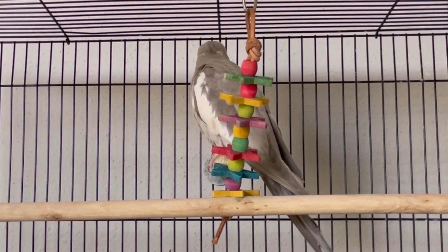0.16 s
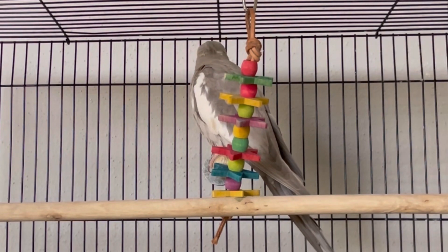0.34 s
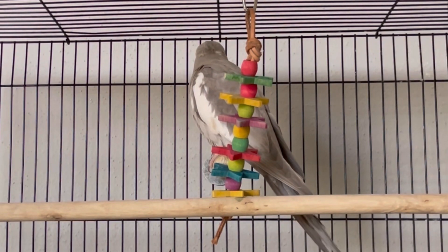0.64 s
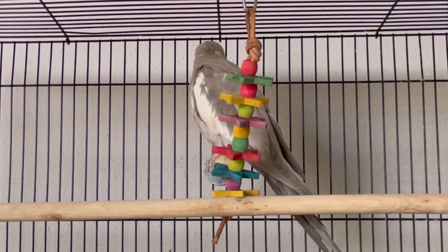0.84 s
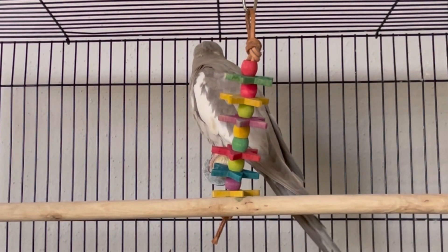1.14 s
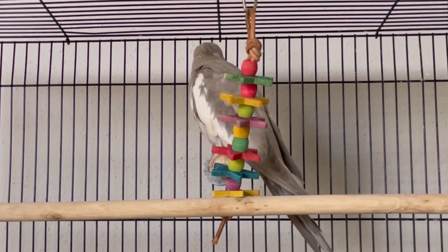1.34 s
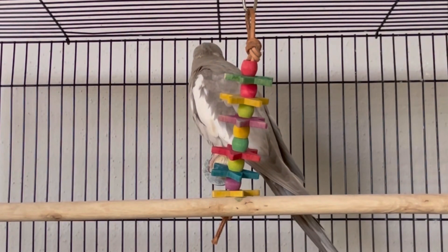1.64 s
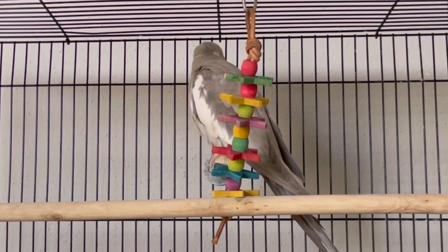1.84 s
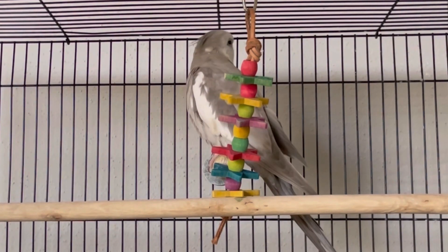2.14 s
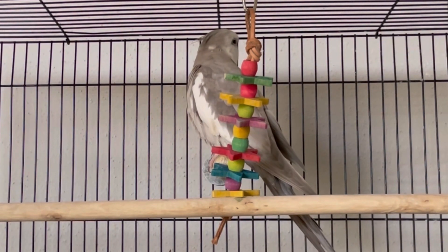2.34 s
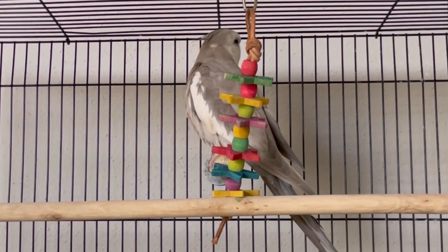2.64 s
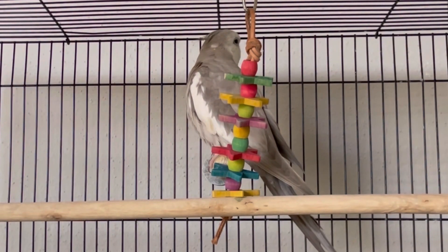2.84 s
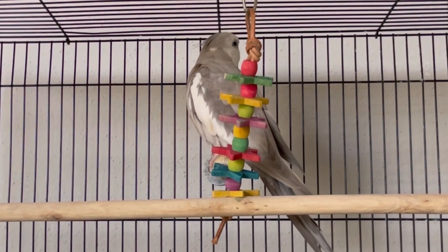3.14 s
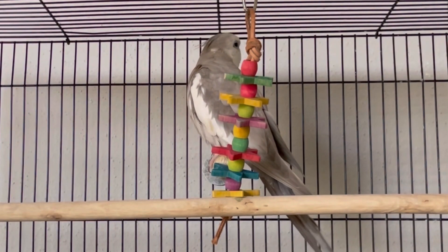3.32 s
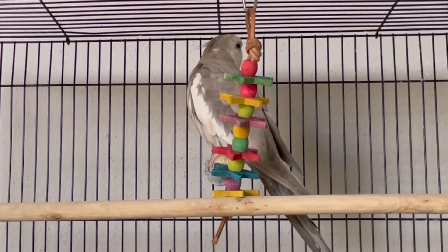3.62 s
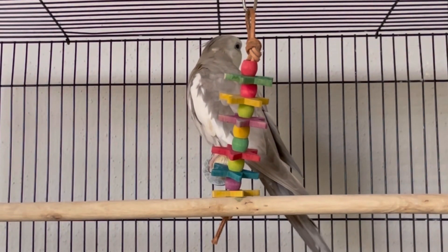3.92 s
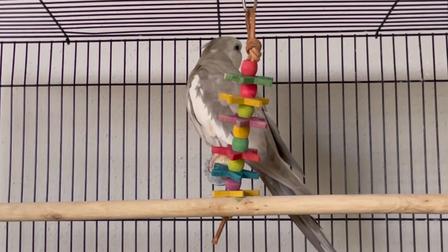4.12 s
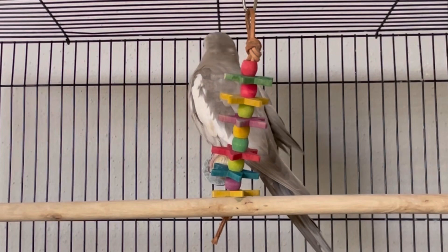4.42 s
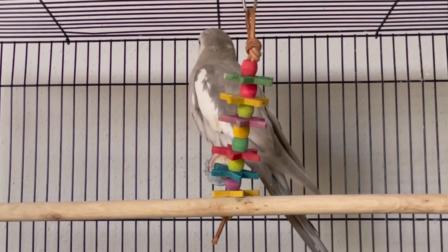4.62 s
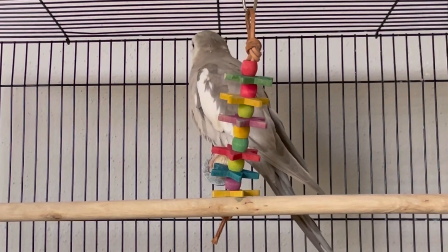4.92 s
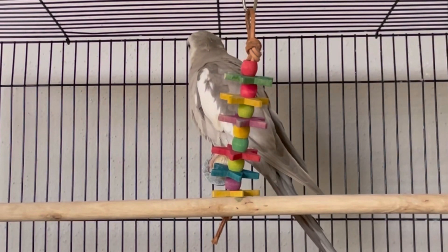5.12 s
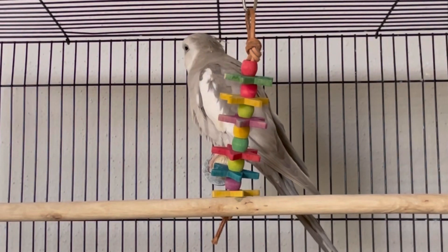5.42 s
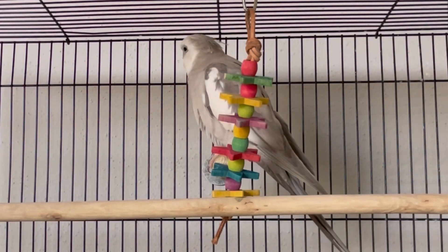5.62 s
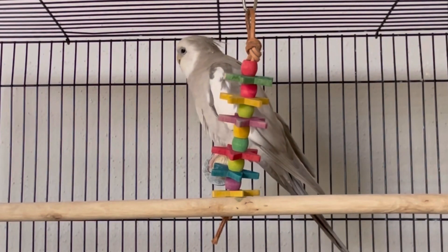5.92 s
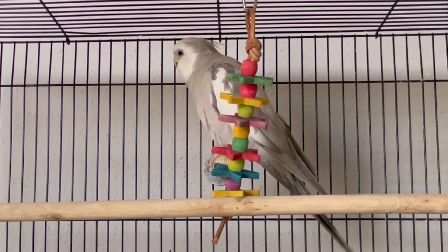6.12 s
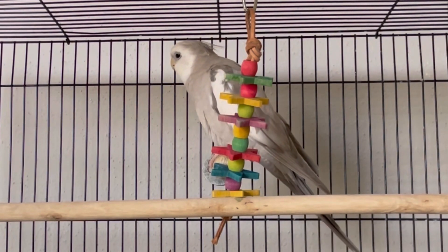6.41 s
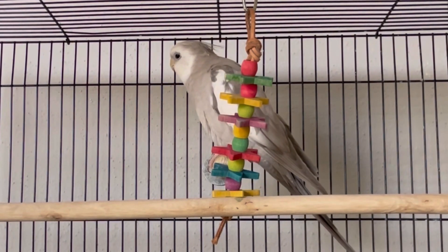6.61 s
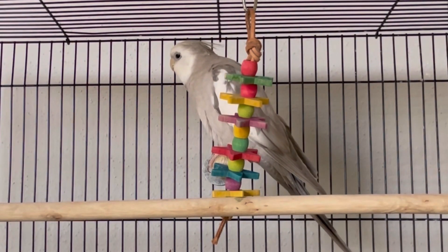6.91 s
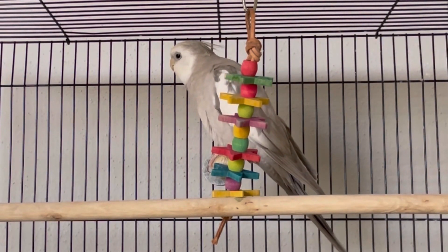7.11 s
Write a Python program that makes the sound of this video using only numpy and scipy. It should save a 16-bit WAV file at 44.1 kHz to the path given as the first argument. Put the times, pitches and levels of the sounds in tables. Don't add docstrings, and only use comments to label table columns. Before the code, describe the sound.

Three phrases from a caged cockatiel, separated by pauses. The first has bright falling and rising whistles with low fluttering notes; the second goes from soft peeps to a strong upward swoop and sharp dive; the third is harsher, with honks, croaky yelps and a later buzz. Near stereo pickup, lively reverberant walls, a slight metallic ring of bars, and quiet house rumble underneath.

```python
import sys
import numpy as np
from scipy import signal
from scipy.fft import rfft, irfft, next_fast_len
from scipy.io import wavfile
from scipy.ndimage import map_coordinates

SR = 44100
rng = np.random.default_rng(int(sys.argv[2]) if len(sys.argv) > 2 else 0)


def wrap_up_sound(samples):
    columns = np.atleast_2d(samples).T
    tamed = np.clip(columns, -1, 1)
    steps = np.round(tamed * 32767).astype(np.int16)
    wavfile.write(sys.argv[1], SR, steps)


def amplitude_ratio(level_db):
    exponent = np.asarray(level_db, float) / 20
    return 10 ** exponent


N = 320166


def along(points, hz):
    f, v = np.transpose(points)
    return np.interp(np.log(hz + 1), np.log(f + 1), v)


def unit(x):
    return x / np.sqrt(np.mean(x ** 2) + 1e-20)


def wobble(rate_hz):
    knots = rng.standard_normal(N // 32)
    return map_coordinates(knots, [np.arange(N) * min(rate_hz, 1300) / SR])


def filtered(x, response):
    m = next_fast_len(N + 8192)
    return irfft(rfft(x, m) * response(np.fft.rfftfreq(m, 1 / SR)), m)[..., :N]


def voiced(curve, second_db, upper_db):
    s, hz, db = np.transpose(curve)
    lift_db = .4 * (db.max() - db)
    return np.transpose([s, hz, db, second_db + lift_db, upper_db + lift_db])


def shaped(notes, manner):
    hurry, arch, attack_s, release_s, onset_db, tilt_db, end_db, second_db, upper_db = manner
    u = np.linspace(0, 1, num=25)
    glide = np.expm1(hurry * u) / np.expm1(hurry)
    lines = []
    for start_s, length_s, first_hz, last_hz, db in notes:
        hz = (first_hz + (last_hz - first_hz) * glide) * (1 + arch * np.sin(np.pi * u))
        opened = min(attack_s / length_s, .7)
        closing = np.clip(1 - release_s / length_s, opened + .04, .98)
        level_db = db + np.interp(u, [0, opened, closing, 1], [onset_db, 0, tilt_db, end_db])
        curve = np.transpose([start_s + length_s * u, hz, level_db])
        lines.append(voiced(curve, second_db, upper_db))
    return lines


def sing(notes, flow, rough, jitter, slope_db, fourth_db, breath_db, half_db, frayed=1):
    out = np.zeros(N)
    bend, air, shake, drift, fray = flow
    for rows in notes:
        s, *cols = np.transpose(rows)
        at = np.arange(round(s[0] * SR), min(round(s[-1] * SR), N + 1) - 1)
        hz, db, second_db, upper_db = (np.interp(at / SR, s, c) for c in cols)
        phase = 2 * np.pi * np.cumsum(hz * (1 + bend[at] + jitter * drift[at])) / SR
        overtones = amplitude_ratio(second_db) * np.sin(2 * phase) + amplitude_ratio(upper_db) * np.sin(3 * phase)
        for k in range(4, 8):
            partial_db = upper_db + fourth_db + slope_db * (k - 4)
            overtones += amplitude_ratio(partial_db) * np.sin(k * phase) * (k * hz < 16000)
        tone = np.sin(phase) + overtones * (1 + .7 * frayed * fray[at])
        tone *= np.sqrt(2) * (1 + rough * shake[at])
        tone *= 1 + amplitude_ratio(half_db) * np.sin(phase / 2)
        rise = np.clip((at - at[0] + (at[0] == 0) * SR) / (.0025 * SR), 0, 1)
        fall = np.clip((at[-1] - at) / (.005 * SR), 0, 1)
        gate = np.sin(np.pi / 2 * rise * fall) ** 2
        out[at] += amplitude_ratio(db) * gate * (tone + amplitude_ratio(breath_db) * air[at])
    return out


# glide_hurry (>0 late, <0 early), arch_share (of pitch), attack_s,
# release_s, onset_db, tilt_db, end_db, second_db (partial 2), upper_db (partials 3 up)
FALL_MANNER = (2.8, .005, .026, .005, -11, -2, -4, -35, -40)
PLUNGE_MANNER = (.3, .003, .002, .007, -1.5, -4, -18, -23, -36)
RISE_MANNER = (-3.5, .003, .014, .006, -10, 1.5, -3, -34, -42)
# start_s, length_s, first_hz, last_hz, level_db
FALLS = [
    (.998, .037, 3137, 2480, -17),
    (1.357, .031, 2994, 2450, -14.5),
]
# start_s, length_s, first_hz, last_hz, level_db
PLUNGES = [
    (1.031, .011, 2500, 1900, -24),
    (1.384, .01, 2480, 1850, -20),
    (4.003, .014, 2650, 1720, -19),
]
# start_s, length_s, first_hz, last_hz, level_db
RISES = [
    (1.152, .076, 2340, 2570, -18),
    (3.337, .115, 2420, 2670, -17.5),
]
# time_s, pitch_hz, level_db
OPENING = [
    (0, 2595, -14.5),
    (.03, 2605, -13.5),
    (.047, 2600, -13.5),
    (.053, 2520, -18),
]
# time_s, pitch_hz, level_db
SWOOP = [
    (3.566, 1263, -33),
    (3.6, 1540, -27),
    (3.622, 1790, -33),
    (3.645, 2030, -33),
    (3.676, 2270, -19),
    (3.724, 2545, -13),
    (3.76, 2705, -19),
    (3.78, 2750, -27),
    (3.82, 2798, -30),
]
# time_s, pitch_hz, level_db
DIVE = [
    (3.91, 2838, -30),
    (3.948, 2920, -18.5),
    (3.98, 2945, -17),
    (3.992, 2900, -11.5),
    (4.002, 2737, -15),
    (4.007, 2600, -20),
]


def whistles(flow):
    notes = shaped(FALLS, FALL_MANNER) + shaped(PLUNGES, PLUNGE_MANNER) + shaped(RISES, RISE_MANNER)
    notes += [voiced(OPENING, -38, -38), voiced(SWOOP, -37, -42), voiced(DIVE, -41, -45)]
    return amplitude_ratio(-1) * sing(notes, flow, rough=.017, jitter=.003, slope_db=1.5, fourth_db=-4,
                          breath_db=-46, half_db=-58)


PEEP_MANNER = (-.3, .003, .011, .01, -6, -1.5, -3, -16, -44)
# start_s, length_s, first_hz, last_hz, level_db
PEEPS = [
    (2.688, .042, 1265, 1500, -38),
    (2.778, .036, 1270, 1320, -37),
    (7.22, .08, 1320, 1400, -44),
]
# time_s, pitch_hz, level_db
HELD = [
    (3.032, 1712, -36.5),
    (3.084, 1722, -28),
    (3.162, 1773, -37.5),
    (3.19, 1750, -29.5),
    (3.226, 1763, -39),
    (3.232, 1792, -35),
    (3.3, 1763, -36.5),
]


def soft_notes(flow):
    notes = shaped(PEEPS, PEEP_MANNER) + [voiced(np.add(HELD, [0, 0, .7]), -31, -37)]
    return amplitude_ratio(1) * sing(notes, flow, rough=.035, jitter=.007, slope_db=-4, fourth_db=-4,
                         breath_db=-44, half_db=-60, frayed=.4)


SAG_MANNER = (-3.6, .003, .018, .02, 7, 1.5, -1.5, -25, -35)
# start_s, length_s, first_hz, last_hz, level_db
SAGS = [
    (.05, .056, 2330, 1600, -30),
    (1.223, .069, 2350, 1670, -27),
]


def sags(flow):
    return sing(shaped(SAGS, SAG_MANNER), flow, rough=.25, jitter=.025, slope_db=-4, fourth_db=-4,
                breath_db=-32, half_db=-45)


MURMUR_MANNER = (.3, .003, .008, .02, -9, -3, -5, -11, -19)
# start_s, length_s, first_hz, last_hz, level_db
MURMURS = [
    (.496, .016, 1700, 1640, -35),
    (.615, .115, 1885, 1730, -33.5),
    (.835, .1, 1780, 1700, -33),
]


def murmurs(flow):
    return amplitude_ratio(2) * sing(shaped(MURMURS, MURMUR_MANNER), flow, rough=.3, jitter=.013, slope_db=-7,
                         fourth_db=-10, breath_db=-12, half_db=-15, frayed=.2)


# time_s, pitch_hz, level_db
BUZZ = [
    (6.83, 2400, -52),
    (6.846, 2200, -33),
    (6.872, 2259, -27),
    (6.93, 2250, -30),
    (6.996, 2204, -28),
    (7.06, 2160, -24),
    (7.093, 2260, -28),
]


def buzz(flow):
    line = voiced(BUZZ, -29, -41)
    one_side = sing([line], flow, rough=.12, jitter=.014, slope_db=5, fourth_db=-17,
                    breath_db=-25, half_db=-30)
    other_side = sing([line * [1, 1.35, 1, 1, 1]], flow, rough=.24, jitter=.027, slope_db=-10,
                      fourth_db=-16, breath_db=-25.5, half_db=-12)
    return amplitude_ratio(2) * one_side + amplitude_ratio(-17) * other_side


HONK_MANNER = (.3, .015, .011, .006, -8, 1.5, -8, 2, -14)
# start_s, length_s, first_hz, last_hz, level_db
HONKS = [
    (5.445, .033, 2040, 2100, -31),
    (5.71, .05, 2190, 2210, -26),
    (5.846, .08, 2220, 2290, -26.5),
]
# time_s, pitch_hz, level_db
STEP = [
    (5.126, 1870, -45),
    (5.14, 1920, -41),
    (5.205, 1960, -37),
]
# time_s, pitch_hz, level_db
STEPPED = [
    (5.2, 2020, -35),
    (5.212, 2190, -28),
    (5.228, 2250, -26.5),
    (5.254, 2220, -30),
]


def squawks(flow):
    notes = shaped(HONKS, HONK_MANNER) + [voiced(STEP, -2, 4), voiced(STEPPED, -2, -13)]
    return amplitude_ratio(-1) * sing(notes, flow, rough=.2, jitter=.014, slope_db=-5, fourth_db=-14,
                          breath_db=-23, half_db=-36, frayed=.3)


YELP_MANNER = (4, .06, .008, .008, -5, 3, -9, 4, -22)
# start_s, length_s, first_hz, last_hz, level_db
YELPS = [
    (6.013, .035, 2203, 1870, -25),
    (6.125, .044, 2211, 1950, -24),
    (6.247, .045, 2228, 1880, -24),
]


def yelps(flow):
    return amplitude_ratio(-1) * sing(shaped(YELPS, YELP_MANNER), flow, rough=.06, jitter=.005, slope_db=-5,
                          fourth_db=-12, breath_db=-28, half_db=-36, frayed=.15)


CROAK_MANNER = (-1.5, .003, .006, .006, 1.5, -1.5, -4, 8, -5)
# start_s, length_s, first_hz, last_hz, level_db
CROAKS = [
    (3.588, .018, 1420, 1530, -54),
    (5.898, .017, 2430, 2240, -46),
    (5.936, .017, 1804, 1546, -41),
    (6.049, .02, 1815, 1456, -36),
    (6.17, .026, 1905, 1480, -41),
    (6.294, .019, 1740, 1477, -40),
]


def croaks(flow):
    return amplitude_ratio(-1) * sing(shaped(CROAKS, CROAK_MANNER), flow, rough=.2, jitter=.015, slope_db=-6,
                          fourth_db=-6, breath_db=-13, half_db=-4)


GRATE_MANNER = (.3, .02, .012, .012, -8, -1.5, -9, -3, -9)
# start_s, length_s, first_hz, last_hz, level_db
GRATES = [
    (5.34, .1, 2100, 2100, -41),
    (5.595, .065, 2110, 1960, -40),
    (5.758, .035, 2150, 2007, -42),
    (5.92, .055, 2000, 1900, -35),
]


def grates(flow):
    return amplitude_ratio(-2) * sing(shaped(GRATES, GRATE_MANNER), flow, rough=.7, jitter=.045, slope_db=-10,
                          fourth_db=-14, breath_db=-12, half_db=-11)


RASP_MANNER = (.3, .02, .02, .03, -12, -3, -16, -25, -33)
# start_s, length_s, first_hz, last_hz, level_db
RASPS = [
    (.28, .045, 1600, 1450, -35),
    (1.127, .03, 1900, 2050, -37),
    (2.879, .11, 1870, 1845, -31),
    (3.43, .06, 1900, 2180, -31),
]


def rasps(flow):
    return amplitude_ratio(-1) * sing(shaped(RASPS, RASP_MANNER), flow, rough=.6, jitter=.05, slope_db=-8,
                          fourth_db=-8, breath_db=-18, half_db=-10)


# start_s, end_s, rate_hz, depth (0-1), slide_share (of pitch)
THROBS = [
    (-.002, .053, 47, .7, 0),
    (.613, .73, 46, .65, .015),
    (.833, .935, 45, .5, .015),
    (1.17, 1.226, 71, .8, 0),
    (2.878, 2.98, 62, .8, .12),
    (3.396, 3.452, 89, .65, 0),
    (5.7055, 5.762, 54, .98, .02),
    (5.845, 5.861, 62, .7, .02),
    (6.8395, 7.095, 68.5, .96, .065),
]


def valve():
    gain, bend = np.ones(N), np.zeros(N)
    for start_s, end_s, rate_hz, depth, slide in THROBS:
        at = np.arange(max(round(start_s * SR) - 300, 0), round(end_s * SR) + 300)
        t = at / SR
        turns = rate_hz * np.clip(t - start_s, 0, end_s - start_s)
        sharp = 2.1 - 1.6 * turns / turns[-1]
        inside = np.clip(np.minimum(t - start_s, end_s - t) / .006 + 1, 0, 1)
        burst = np.abs(np.sin(np.pi * turns)) ** (2 * sharp)
        gain[at] *= 1 - inside * min(depth, 1) * (1 - burst)
        bend[at] += inside * slide * np.sin(2 * np.pi * turns)
    gain *= amplitude_ratio(1.2 * wobble(60))
    return gain, bend


# freq_hz, level_db (per Hz)
BREATH = [(300, -17), (600, -3), (1500, 0), (2700, 0), (4500, -9), (7000, -22), (11000, -34), (16000, -50)]
# freq_hz, gain_db
THROAT = [(500, -16.5), (1200, -2.5), (3000, 1), (5000, -3), (6600, -1), (7600, -5.5), (12000, -0.5),
          (15500, -5)]


def bird():
    gain, bend = valve()
    air = unit(filtered(rng.standard_normal(N), lambda hz: amplitude_ratio(along(BREATH, hz))))
    shake, drift, fray = wobble(900), wobble(400), wobble(500)
    flow = bend, air, shake, drift, fray
    song = whistles(flow) + soft_notes(flow) + sags(flow) + murmurs(flow) + buzz(flow)
    song += squawks(flow) + yelps(flow) + croaks(flow) + grates(flow) + rasps(flow)
    return filtered(song * gain, lambda hz: amplitude_ratio(along(THROAT, hz)))


# time_s, level_db, centre_hz, width_hz
TICK = (4.493, -54, 6500, 1600)


def claw():
    time_s, db, centre_hz, width_hz = TICK
    blow = np.zeros(N)
    blow[round(time_s * SR)] = amplitude_ratio(db + 23)

    def resonance(f):
        damping = 1j * f * width_hz
        return (damping / (centre_hz ** 2 - f * f + damping)) ** 2
    return filtered(blow, resonance)


# freq_hz, level_db, t60_s
CAGE = [
    (2405, -40, 1.0),
    (2690, -39, 1.1),
    (2830, -39, 1.2),
]


def cage(x):
    t = np.arange(SR * 3 // 2) / SR
    ring = np.zeros(len(t))
    for hz, db, t60_s in CAGE:
        ring += amplitude_ratio(db - 60 * t / t60_s) * np.sqrt(14 / t60_s / SR) * np.sin(2 * np.pi * hz * t)
    return signal.fftconvolve(x, ring)[:N]


# freq_hz, gain_db
BRIGHT_ROOM = [(3000, 0), (4200, .7), (5500, 2.5), (15000, 2.5)]
# freq_hz, t60_s
ROOM_DECAY = [(500, 0.46), (1500, 0.88), (2800, 0.62), (4500, 0.76), (9000, 0.33), (14000, .36)]


def room(x):
    x = filtered(x, lambda hz: amplitude_ratio(along(BRIGHT_ROOM, hz)))
    hz, t, z = signal.stft(rng.standard_normal((2, SR * 3 // 2)), SR, nperseg=256)
    decay = amplitude_ratio(-60 * t / along(ROOM_DECAY, hz)[:, None])
    tail = signal.istft(z * decay, SR, nperseg=256)[1]
    t = np.arange(tail.shape[1]) / SR
    tail = tail * np.clip(t / .014, 0, 1) * (1 + .4 * amplitude_ratio(-60 * t / .3))
    tail = np.array([tail[0] + .65 * tail[1], tail[0] - .65 * tail[1]])
    return signal.fftconvolve(x[None], tail / np.linalg.norm(tail[0]), axes=1)[:, :N]


def earlier():
    t = np.arange(N) / SR
    left_hz_db = [(1100, -52.5), (1600, -16), (2250, 3), (2620, -5), (3000, -22.5), (3500, -47.5),
                  (4800, -50), (5200, -39.5), (5700, -57), (7300, -54), (7800, -19), (8400, -54),
                  (9900, -53), (10400, -25), (11200, -55.5)]
    ring = filtered(rng.standard_normal((2, N)), lambda hz: amplitude_ratio(along(left_hz_db, hz)))
    return amplitude_ratio(-30 - 80 * t) * unit(ring)


# freq_hz, level_db (per Hz)
HUM = [(20, -32), (33, -22), (42, -2), (52, 4.5), (75, -8.5), (100, -6.5), (125, -19), (190, -23),
       (300, -33.5), (600, -36), (1200, -44.5), (4000, -52.5), (8000, -56.5), (16000, -69)]
# freq_hz, correlation (0-1)
ALIKE = [(50, 1), (120, 0.52), (300, 0.96), (700, 0.37), (3000, .3), (10000, .3)]


def house():
    def mid_side(hz):
        turn = np.arccos(np.clip(along(ALIKE, hz), -1, 1)) / 2
        return amplitude_ratio(along(HUM, hz)) * [np.cos(turn), np.sin(turn)]
    mid, side = filtered(rng.standard_normal((2, N)), mid_side)
    lean_hz_db = [(60, -2.5), (130, -.8), (300, -1), (600, .2)]
    left_right = np.array([[1], [-1]])
    pair = np.array([mid + side, mid - side])
    pair = filtered(pair, lambda hz: amplitude_ratio(along(lean_hz_db, hz) * left_right))
    pair = amplitude_ratio(-57) * unit(pair)
    rumble = filtered(pair, lambda hz: 1 / (1 + (hz / 80) ** 6))
    swell_db = -60.5 + 1.8 * wobble(1.6)
    return pair - rumble + amplitude_ratio(swell_db + 1) * unit(rumble)


def scene():
    near = bird() + claw()
    lead_s = 3e-5 * np.array([[1], [-1]])
    direct = filtered(near, lambda hz: np.exp(1j * np.pi * hz * lead_s))
    direct = direct * amplitude_ratio([[-.4], [.4]])
    return direct + amplitude_ratio(-5.5) * room(near) + cage(near) + earlier() + house()


def roll_off(x):
    return signal.sosfilt(signal.butter(12, 15600, fs=SR, output="sos"), x)


def record(dry):
    return roll_off(dry)


dry = scene()
out = record(dry)
wrap_up_sound(out)
```